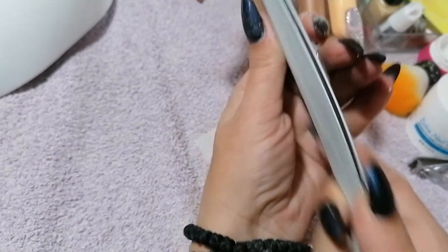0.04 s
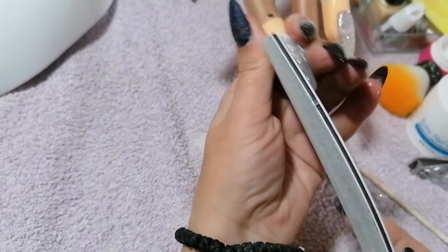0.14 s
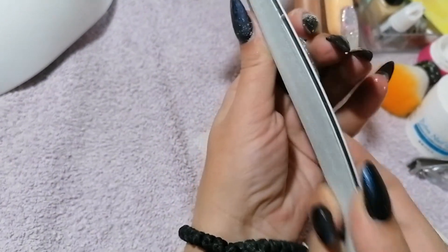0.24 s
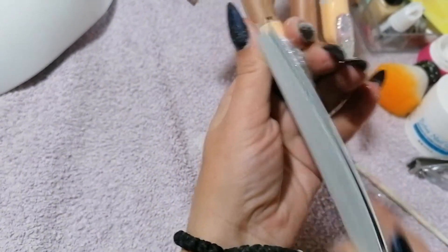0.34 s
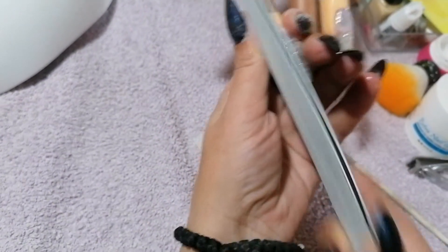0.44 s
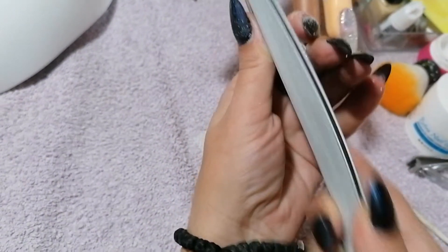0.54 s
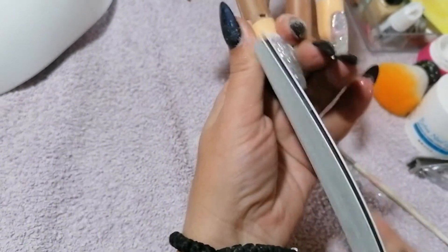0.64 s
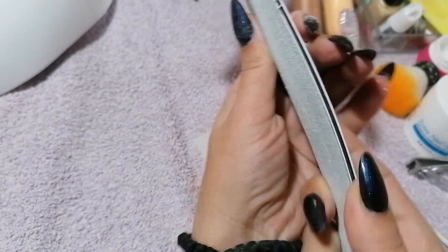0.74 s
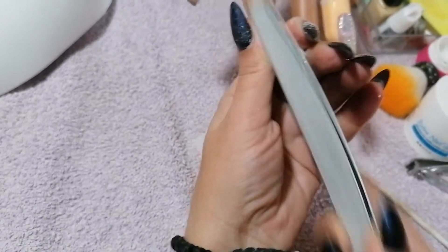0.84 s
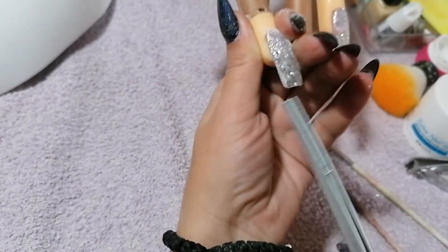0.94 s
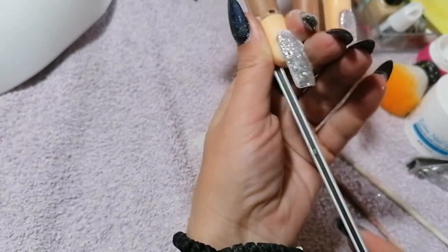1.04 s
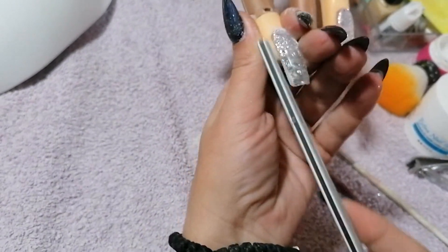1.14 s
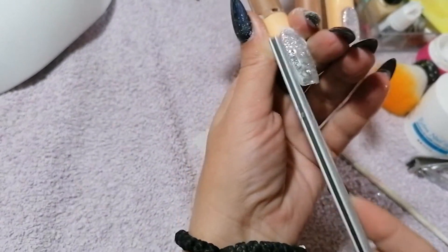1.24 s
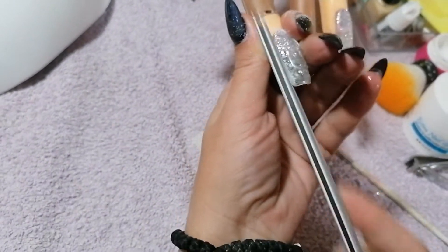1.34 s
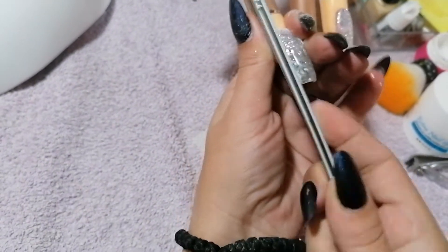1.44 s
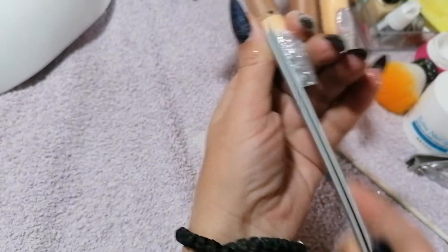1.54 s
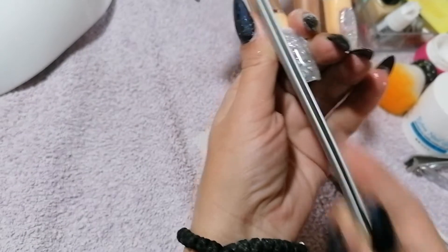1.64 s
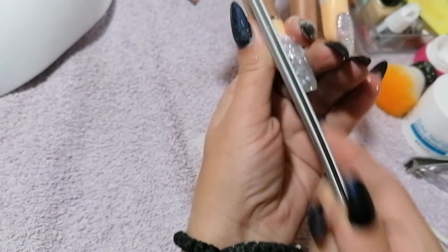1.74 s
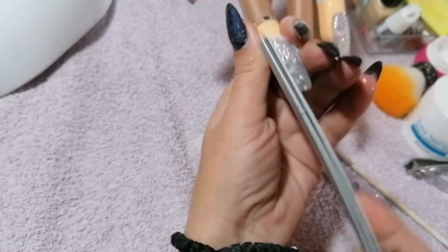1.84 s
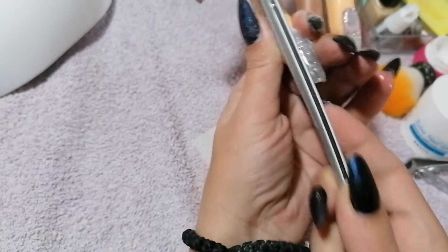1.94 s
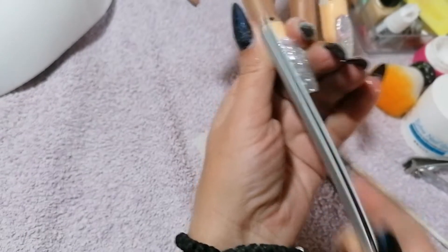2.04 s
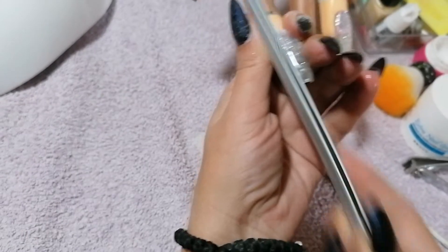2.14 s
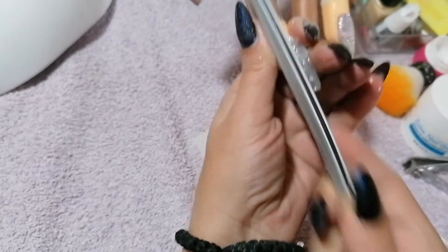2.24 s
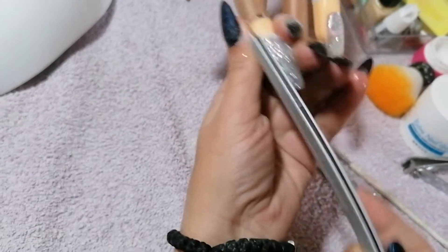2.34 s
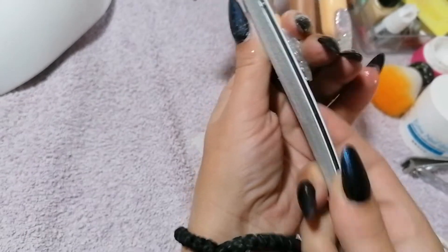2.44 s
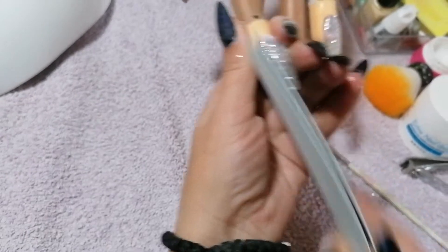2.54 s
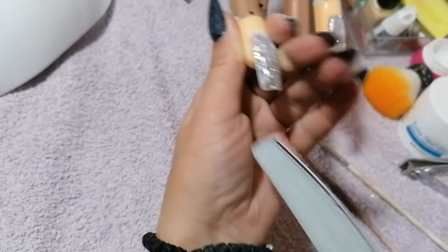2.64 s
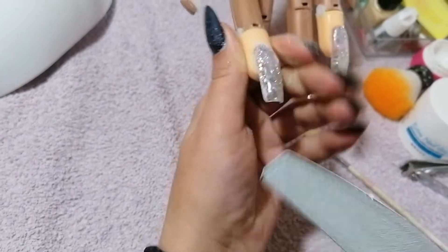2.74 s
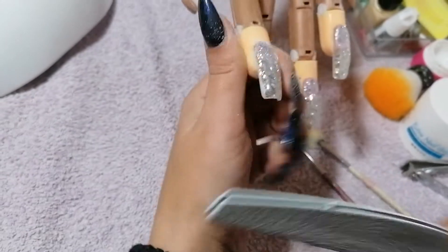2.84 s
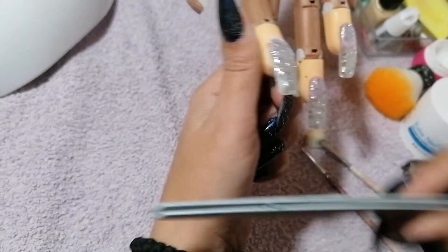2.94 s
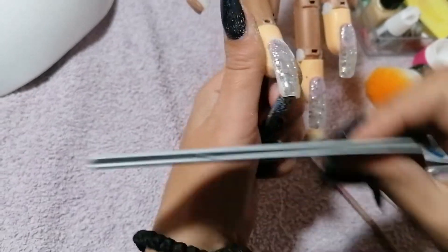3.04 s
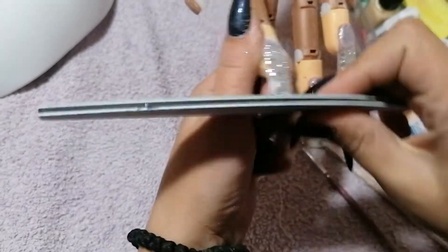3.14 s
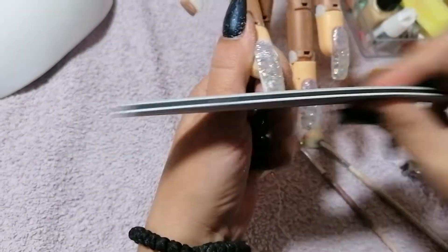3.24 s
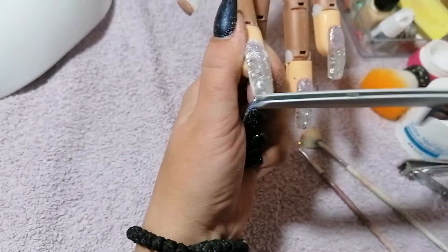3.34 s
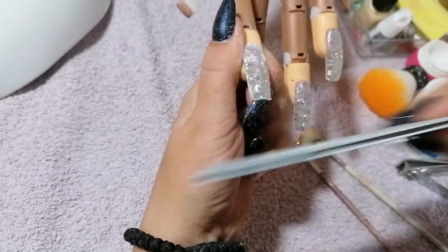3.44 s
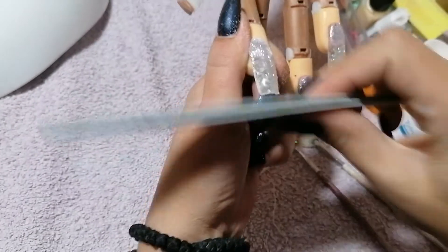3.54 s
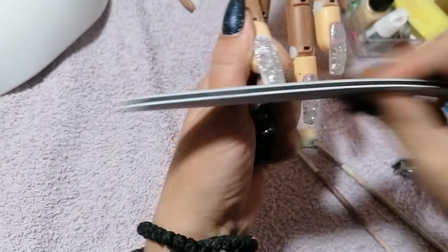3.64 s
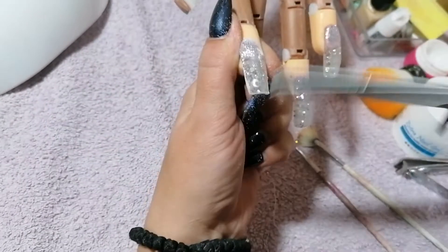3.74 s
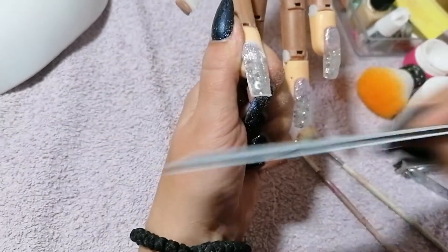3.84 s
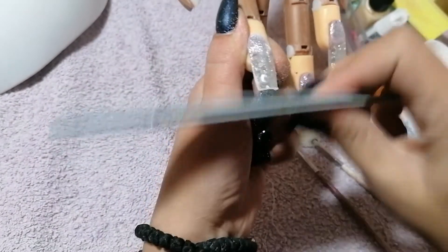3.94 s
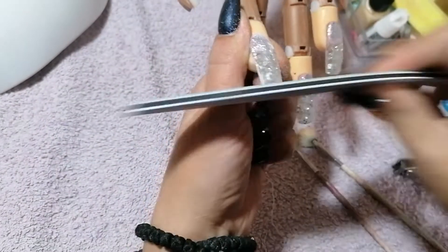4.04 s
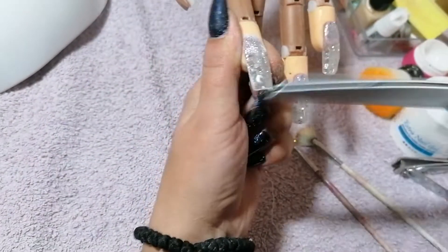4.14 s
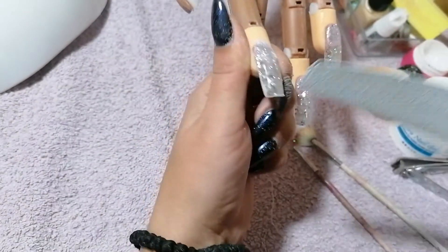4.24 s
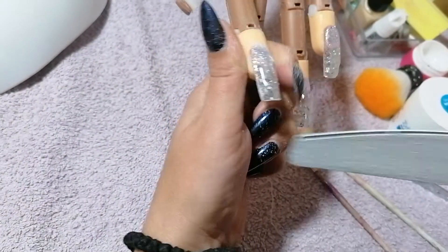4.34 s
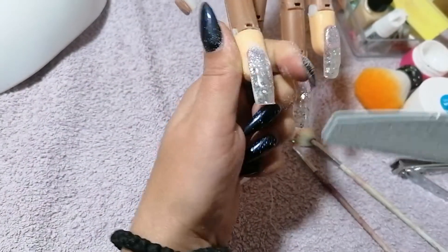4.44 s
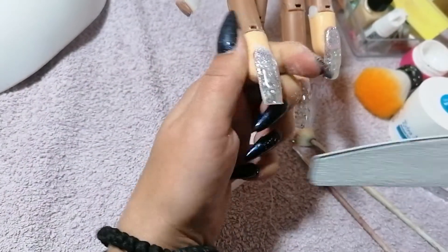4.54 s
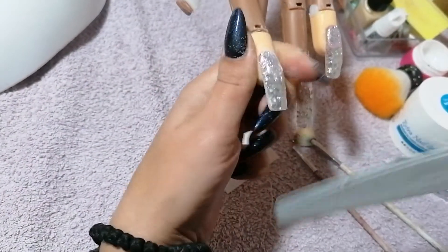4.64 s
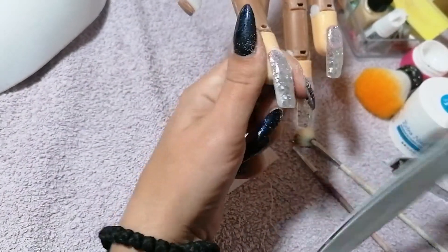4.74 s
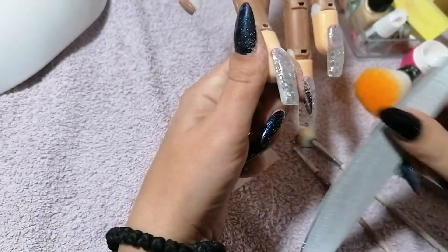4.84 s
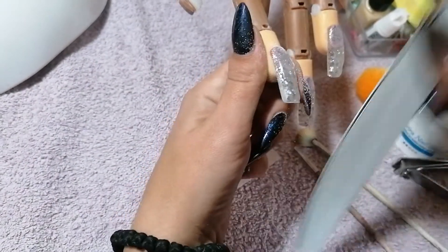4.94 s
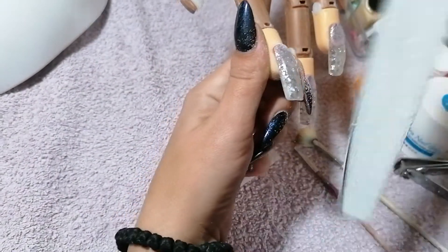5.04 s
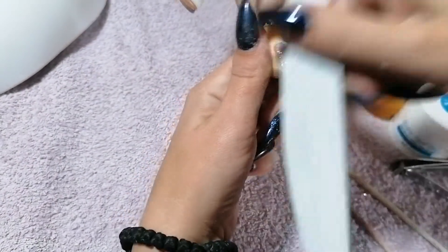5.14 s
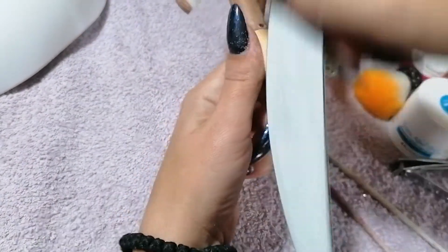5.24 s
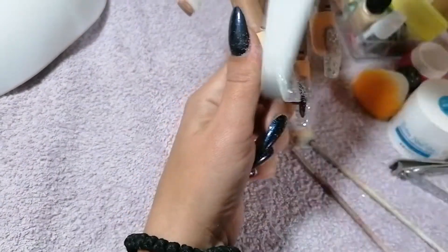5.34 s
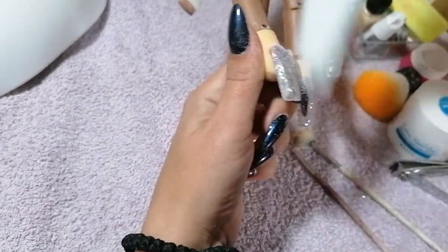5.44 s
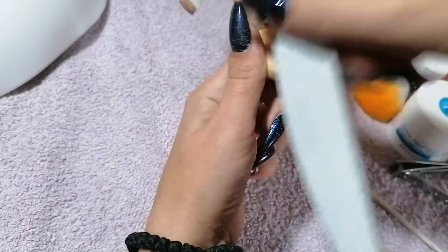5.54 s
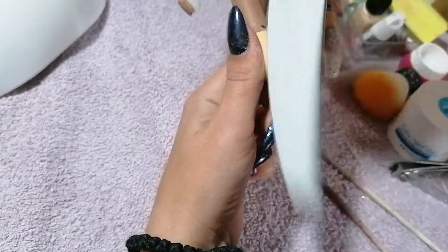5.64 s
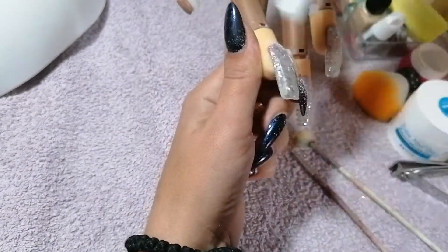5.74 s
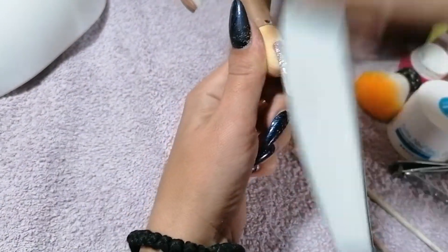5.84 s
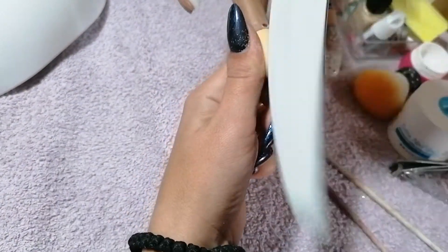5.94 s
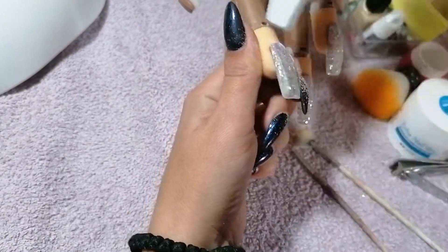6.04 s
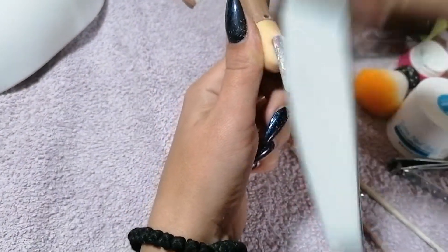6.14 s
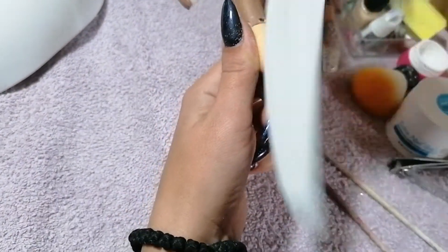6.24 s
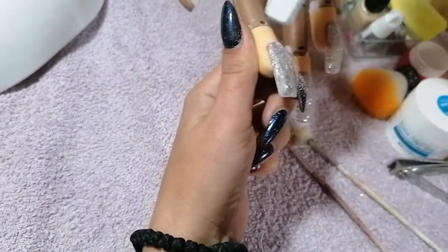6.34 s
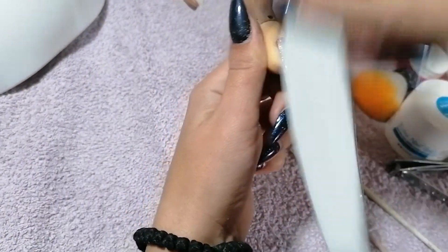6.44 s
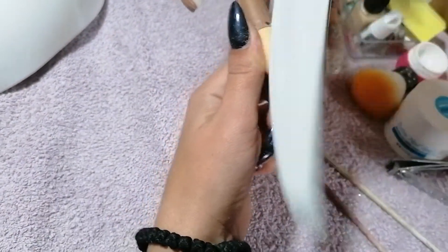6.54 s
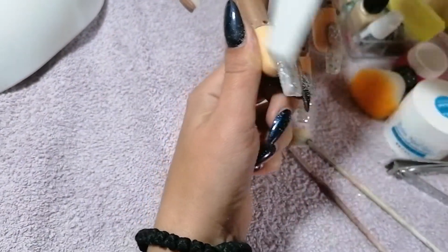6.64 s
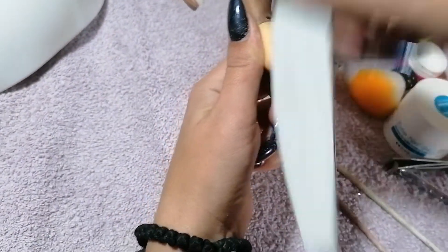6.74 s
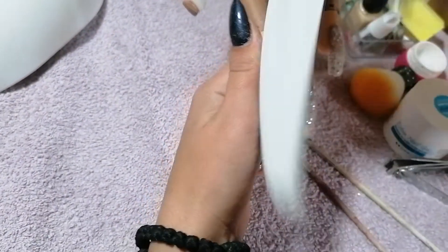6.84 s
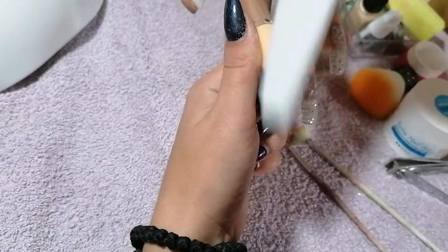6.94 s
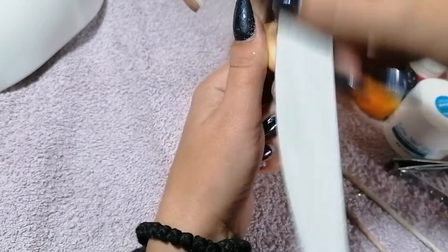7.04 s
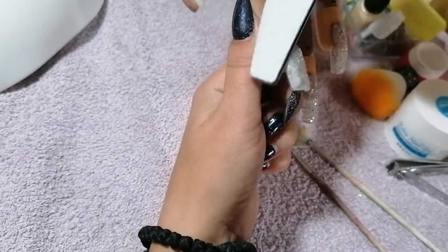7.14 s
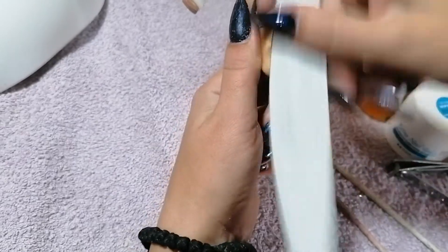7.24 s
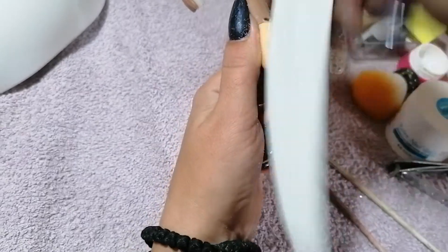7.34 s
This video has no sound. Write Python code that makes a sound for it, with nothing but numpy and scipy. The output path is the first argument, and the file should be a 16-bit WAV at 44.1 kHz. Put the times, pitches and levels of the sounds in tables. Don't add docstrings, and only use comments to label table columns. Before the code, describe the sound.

A nail file scratches a plastic practice nail in brief gritty strokes, pausing often, over low handling thumps, small clicks and steady room hiss.

```python
import sys
import numpy as np
from scipy import signal
from scipy.fft import rfft, irfft, next_fast_len
from scipy.io import wavfile
from scipy.ndimage import uniform_filter1d, map_coordinates

SR = 44100
rng = np.random.default_rng(int(sys.argv[2]) if len(sys.argv) > 2 else 0)


def how_loud(loudness_db):
    steps = np.asarray(loudness_db, float) / 20
    return 10 ** steps


def wav_out(sig):
    wavfile.write(sys.argv[1], SR, np.round(np.clip(np.atleast_2d(sig).T, -1, 1) * 32767).astype(np.int16))


N = 326538


def unit(x):
    return x / np.sqrt(np.mean(x ** 2) + 1e-20)


def even(x, size):
    return unit(x / (uniform_filter1d(abs(x), size) + 0.3))


def along(points, hz):
    f, v = np.transpose(points)
    return np.interp(np.log(hz + 1), np.log(f + 1), v)


def wobble(rate):
    knots = rng.standard_normal(int(N * rate / SR) + 4)
    return map_coordinates(knots, [np.arange(N) * rate / SR])


def filtered(x, response):
    m = next_fast_len(N + 8192)
    return irfft(rfft(x, m) * response(np.fft.rfftfreq(m, 1 / SR)), m)[..., :N]


def resonances(modes):
    def mode(f, centre, width, db):
        loss = 1j * f * width
        return how_loud(db) * loss / (centre * centre - f * f + loss)
    return lambda f: sum((-1) ** k * mode(f, *row) for k, row in enumerate(modes))


def patchy(x, depth_db, bins, frames):
    z = signal.stft(x, nperseg=256)[2]
    field = uniform_filter1d(rng.standard_normal(z.shape[-2:]), bins, 0)
    field = uniform_filter1d(field, frames, 1)
    return signal.istft(z * how_loud(depth_db * unit(field)), nperseg=256)[1][..., :N]


def add(track, s, piece):
    at = track[round(s * SR):][:len(piece)]
    at += piece[:len(at)]


def window(start, end, fade):
    i = np.arange(max(round((start - fade) * SR), 0), min(round((end + fade) * SR), N))
    edge = lambda v: np.sin(np.pi / 2 * np.clip(v / fade + 0.5, 0, 1)) ** 2
    return i, edge(1.19 * (i / SR - start)) * edge(end - i / SR)


# (frequency [Hz], density [dB per Hz])
AIR = [(59, -28), (100, -0.5), (146, -8.5), (306, -10), (355, -14), (603, -15), (919, -18.5), (1370, -18.5),
       (5660, -29.5), (7610, -36), (8450, -44), (14300, -44.5), (15600, -44)]
# (frequency [Hz], correlation [0-1])
ALIKE = [(60, 0.995), (380, 0.999), (2380, 0.997), (15000, 0.96)]
AIR_DB = -68.5


def air():
    turn = lambda hz: np.arccos(np.clip(along(ALIKE, hz), -1, 1)) / 2
    parting = unit(patchy(rng.standard_normal(N), 9, bins=2, frames=12))
    common = patchy(rng.standard_normal(N), 1.28, bins=4, frames=20)
    split = lambda hz: how_loud(along(AIR, hz)) * [np.cos(turn(hz)), np.sin(turn(hz))]
    mid, side = filtered(np.array([common, parting]), split)
    return how_loud(AIR_DB + 0.8 * wobble(3)) * unit(np.array([mid + side, mid - side]))


# (frequency [Hz], density [dB per Hz])
RUMBLE = [(8.8, -31.5), (15, 7), (64, -9), (97, -25), (265, -35), (339, -42.5), (400, -41.5), (520, -85),
          (880, -120)]
# (start [s], hold [s], shake [dB])
PUSHES = [(0.087, 0.045, -50), (0.202, 0.16, -46), (0.456, 0.089, -45), (0.564, 0.12, -49.5),
          (0.864, 0.14, -47), (1.403, 0.016, -47), (1.496, 0.012, -49), (1.611, 0.081, -44.5),
          (1.766, 0.015, -45), (1.867, 0.1, -43), (2.039, 0.3, -46.5), (2.414, 0.14, -49.5),
          (2.644, 0.094, -49.5), (2.834, 0.043, -45), (3.114, 0.017, -52.5), (3.361, 0.023, -45),
          (3.458, 0.051, -47.5), (3.754, 0.12, -50), (4.142, 0.16, -48), (4.635, 0.1, -47.5),
          (4.95, 0.031, -46), (5.358, 0.14, -46.5), (5.721, 0.17, -48), (5.943, 0.12, -50),
          (6.178, 0.041, -53), (6.38, 0.13, -46), (6.629, 0.094, -50), (6.814, 0.042, -51),
          (6.933, 0.19, -50), (7.298, 0.082, -50)]
# (time [s], shake [dB])
NUDGES = [(0.75, -59), (3.2, -57.5), (1.33, -66), (0.59, -46), (6.08, -46.5), (1.08, -51), (1.22, -56),
          (3.0, -66), (3.55, -51), (4.0, -59.5), (4.08, -57), (4.39, -49), (4.86, -56.5), (5.21, -66),
          (5.6, -58), (6.28, -53), (7.17, -59), (7.23, -59)]
NUDGE_S = 0.014
RISE_DB_PER_S, SETTLE_DB_PER_S, REST_DB = 503, 352, -68.5


def shake():
    t, db = np.arange(N) / SR, np.full(N, float(REST_DB))
    for start, hold, push_db in PUSHES + [(s, NUDGE_S, nudge_db) for s, nudge_db in NUDGES]:
        rise = RISE_DB_PER_S * np.maximum(start - t, 0)
        settle = SETTLE_DB_PER_S * np.maximum(t - start - hold, 0)
        db = np.maximum(db, push_db - rise - settle)
    sway = unit(filtered(rng.standard_normal(N), lambda hz: how_loud(along(RUMBLE, hz))))
    sway = sway / (uniform_filter1d(abs(sway), 3000) + 0.25)
    lumps = how_loud(db + 1.5 * wobble(27) + np.minimum(5 * wobble(16), 1) + 4.0) * sway
    return filtered(lumps, lambda hz: 1 / (1 + (hz / 400) ** 4))


# (time [s], peak [dB], pitch [Hz], length [s], rattle [dB])
KNOCKS = [(0.031, -55, 1370, 0.0017, -26), (0.293, -68, 386, 0.0088, -20), (.713, -59, 1000, .002, -23),
          (1.557, -50, 274, 0.018, -14), (1.5673, -38, 700, 0.0035, -17), (1.5676, -45, 1470, 0.0032, -34),
          (1.736, -45, 890, 0.0022, -25), (3.399, -34, 1050, 0.0023, -17.5), (3.44, -61, 775, 0.0048, -18),
          (6.118, -48, 287, 0.0035, -19), (6.13, -65, 405, 0.0045, 4.5)]


def knocks():
    out, t = np.zeros(N), np.arange(SR // 10) / SR
    wood = signal.butter(2, [200, 1000], "bandpass", fs=SR)
    for s, db, hz, length, rattle_db in KNOCKS:
        partials = [(1, 1), (2.1, 0.3), (3.1, 0.22)]
        tone = sum(strength * np.sin(2 * np.pi * ratio * hz * t) for ratio, strength in partials)
        blow = np.sqrt(np.sin(np.pi * np.clip(t / length, 0, 1)) + 1e-12) * tone
        rattle = unit(signal.lfilter(*wood, rng.standard_normal(len(t))))
        rattle = rattle * how_loud(rattle_db - 60 * t / 0.18) * (1 - np.exp(-t / 0.0014))
        add(out, s, how_loud(db) * (blow + rattle))
    return out


def tabletop(x):
    t = np.arange(SR // 4) / SR
    tail = rng.standard_normal(len(t)) * (how_loud(-60 * t / 0.065) + how_loud(-23.0 - 60 * t / 0.43))
    return signal.fftconvolve(x, tail / np.linalg.norm(tail))[:N]


# (start [s], end [s], hiss [dB], change over the stroke [dB], board over hiss [dB])
SIDE_STROKES = [
    (0.561, 0.598, -42.5, 16, -4),
    (0.595, 0.62, -46, 16, -8),
    (0.634, 0.66, -44, -3, -6),
    (0.697, 0.789, -42, -0.5, -9.5),
    (0.807, 0.851, -41.5, 2.5, -5),
    (0.939, 0.985, -45, -1, -8.5),
    (1.479, 1.493, -51, -2, -10),
    (1.599, 1.621, -47.5, -1.5, -3),
    (2.376, 2.393, -47, 21, -15),
    (2.395, 2.43, -45, 11, -8),
]
TIP_STROKES = [(3.028, 3.035, -51.5, -3, -19), (3.367, 3.388, -49.5, -18, -8),
               (3.405, 3.479, -38.5, -0.5, -4.5), (3.787, 3.813, -37.5, -8.5, -8),
               (5.345, 5.362, -52.5, -4, -6.5), (5.726, 5.741, -50.5, 6, -0.2),
               (5.775, 5.832, -42.5, -2.5, -3), (6.065, 6.086, -49, -9.5, -7),
               (6.146, 6.172, -48.5, -4, -2.5), (6.316, 6.327, -56, -24, -2),
               (6.454, 6.471, -51.5, -1, -6.5), (6.882, 6.886, -53, -23, -11),
               (7.33, 7.346, -58.5, -11, -5.5)]
FLAT_STROKES = [
    (0.237, 0.265, -42.5, -8, -14),
    (1.516, 1.534, -46, -13, -10),
    (1.729, 1.771, -42.5, -2, -4.5),
    (2.145, 2.162, -45.5, -3, -12),
    (2.267, 2.31, -40, 1, -11),
    (2.534, 2.552, -43.5, 2, -5),
]
# (start [s], end [s], hiss [dB], change [dB])
GRAZES = [(-0.006, 0.007, -49.5, -2), (1.31, 1.335, -70.5, -10), (1.345, 1.4, -71, 4),
          (1.397, 1.445, -69.5, -18), (2.598, 2.623, -61, 12), (2.768, 2.819, -60, 6),
          (3.057, 3.122, -69.5, 3), (3.285, 3.329, -72.5, 2), (3.538, 3.597, -70, -6),
          (3.715, 3.729, -68, 4), (5.286, 5.35, -69.5, -6), (5.528, 5.616, -70.5, -12),
          (6.51, 6.59, -70.5, -10)]
RUSTLES = [(0.024, 0.053, -69, 10), (0.548, 0.554, -66, -2), (0.782, 0.808, -62, -5),
           (1.11, 1.135, -71.5, -14), (1.151, 1.166, -77.5, -19), (1.188, 1.31, -80.5, 0),
           (1.576, 1.594, -61.5, 9), (2.917, 2.934, -67, -9), (2.973, 3.025, -69, -5),
           (3.188, 3.316, -79.5, -12), (3.603, 3.731, -74, 6), (4.009, 4.022, -78, -1),
           (4.074, 4.095, -78, 2), (4.437, 4.493, -78, 0), (4.522, 4.537, -78, 17),
           (4.607, 4.643, -72.5, -1), (4.97, 5.167, -79.5, -2), (5.616, 5.697, -79, -10),
           (5.915, 5.936, -76, 4), (6.245, 6.275, -79.5, -5), (1.445, 1.475, -80, 0), (3.33, 3.36, -80, 0),
           (4.495, 4.52, -81, 2), (6.834, 6.872, -79, 6), (5.836, 5.85, -74, -6), (3.817, 3.828, -70, -6),
           (1.776, 1.785, -66.5, -1)]
WHISKS = [
    (4.103, 4.119, -65, -1),
    (4.329, 4.367, -64.5, 7),
    (4.364, 4.401, -61.5, -5),
    (4.408, 4.434, -65.5, 0),
    (5.18, 5.213, -61, 0),
    (5.212, 5.274, -55, -13.5),
]
DRAGS = [
    (0.88, 0.935, -84, 3),
    (0.668, 0.692, -80, 0),
    (2.17, 2.225, -84, -3),
    (2.318, 2.36, -81, -7),
    (2.44, 2.475, -83, -3),
    (3.388, 3.402, -72.5, 0),
    (6.088, 6.115, -79, -3),
    (6.175, 6.195, -80, -4),
    (3.487, 3.515, -82, -4),
    (3.83, 3.86, -82, -4),
]
# (upper band over hiss [dB], lower band over hiss [dB])
GRAZE_BODY_DB = (-2, -4)
RUSTLE_BODY_DB = (3.5, 6)
WHISK_BODY_DB = (-17, -13)
SIDE_NAIL_DB, TIP_NAIL_DB, FLAT_NAIL_DB = -1.5, -11, -3.5


def contacts():
    strokes = [(SIDE_STROKES, SIDE_NAIL_DB), (TIP_STROKES, TIP_NAIL_DB), (FLAT_STROKES, FLAT_NAIL_DB)]
    firm = [(*row[:4], nail_db, row[4]) for rows, nail_db in strokes for row in rows]
    kinds = [(GRAZES, GRAZE_BODY_DB), (RUSTLES, RUSTLE_BODY_DB), (WHISKS, WHISK_BODY_DB),
             (DRAGS, RUSTLE_BODY_DB)]
    return firm + [(*row, *body_db) for rows, body_db in kinds for row in rows]


def handover():
    near = np.zeros(N)
    for start, end, *_ in contacts()[:-len(DRAGS)]:
        i, shape = window(start - 0.003, end + 0.00055, fade=0.0093)
        near[i] += shape
    return np.clip(near, 0, 1)


# (frequency [Hz], density [dB per Hz])
WHISK_AIR = [(8000, -38), (11000, 3), (12500, -3), (14500, -7), (15300, -21)]
# (start [s], end [s], level [dB])
DUST = [(3.303, 3.32, -70), (3.715, 3.732, -73), (4.098, 4.124, -66.5), (4.342, 4.4, -73),
        (4.41, 4.432, -73), (5.18, 5.21, -72), (5.21, 5.245, -63), (5.245, 5.27, -72), (6.147, 6.17, -53),
        (6.453, 6.473, -58), (6.877, 6.886, -66), (7.33, 7.345, -70), (5.53, 5.56, -80)]


def sheen():
    level = np.zeros(N)
    for start, end, db in DUST:
        i, shape = window(start, end, fade=0.012)
        level[i] += shape * how_loud(db)
    return level * unit(filtered(rng.standard_normal(N), lambda hz: how_loud(along(WHISK_AIR, hz))))


# (time [s], peak [dB], pitch [Hz])
TICKS = [(0.807, -46, 8530), (0.965, -36, 7440), (1.3104, -63, 9000), (1.3493, -61, 8040),
         (1.404, -59, 9290), (1.479, -44.5, 9250), (1.598, -44.5, 9100), (2.6163, -47.5, 9800),
         (3.1163, -43, 4100), (3.3199, -56, 4080), (5.2932, -53, 3830), (5.627, -57, 3300),
         (2.8158, -47.5, 2300), (3.0335, -53, 4400), (6.1625, -41, 11900), (6.4653, -46.5, 5570),
         (6.8782, -48.5, 4000), (0.847, -41, 9900), (1.1225, -67, 9300), (6.1505, -51, 7200),
         (6.155, -42, 9700), (5.2952, -50, 6330), (4.417, -56, 9700)]
SNAGS = [(0.5756, -34, 2100), (0.5914, -34, 2840), (0.7154, -34, 3060), (0.7434, -35, 2130),
         (0.8254, -34, 2100), (1.6072, -38, 2790), (1.732, -40, 2810), (1.7414, -35, 2980),
         (2.2864, -32, 9770), (3.4176, -32, 9380), (3.4344, -33, 2390), (3.4544, -34, 4100),
         (3.7928, -32, 6320), (5.8194, -37, 3000)]
SNAG_DB = -5
# (time [s], peak [dB])
TAPS = [
    (6.3135, -45),
    (6.3153, -40),
    (6.318, -40.5),
]
# (frequency [Hz], level [dB], t60 [s])
PLASTIC = [(1050, -1, 0.019), (1630, 0, 0.022), (2090, 7, 0.012), (3560, 1.5, 0.011), (3880, 3, 0.015),
           (4170, -1, 0.013), (6600, -7, 0.013), (8840, -9, 0.02)]


def ticks():
    out, t = np.zeros(N), np.arange(SR // 20) / SR
    for s, db, hz in TICKS + [(s, db + SNAG_DB, hz) for s, db, hz in SNAGS]:
        around = signal.butter(1, [0.59 * hz, min(1.2 * hz, 16000)], "bandpass", fs=SR)
        crack = 1.33 * unit(signal.lfilter(*around, rng.standard_normal(len(t)))) * how_loud(-60 * t / 0.0064)
        ping = np.sin(2 * np.pi * hz * t) * how_loud(-60 * t / 0.007)
        add(out, s, how_loud(db + 4.0) * (0.61 * np.sqrt(hz / 9000) * crack + ping))
    for s, db in TAPS:
        ring = sum(how_loud(level + rng.normal(0, 2.5) - 60 * t / t60) * np.sin(2 * np.pi * hz * t)
                   for hz, level, t60 in PLASTIC)
        add(out, s, how_loud(db) * 0.54 * ring)
    return out


# (start [s], end
# [s], pitch [Hz], width [Hz], level [dB])
LOCKS = [(0.628, 0.658, 606, 80, -52.5), (1.143, 1.163, 2000, 300, -68), (3.022, 3.04, 6040, 900, -59.5),
         (3.117, 3.12, 2215, 500, -50), (3.231, 3.279, 303, 30, -64), (3.321, 3.325, 2300, 500, -50),
         (3.369, 3.384, 1050, 150, -56), (3.371, 3.384, 4040, 400, -55), (3.4, 3.45, 299, 59.7, -51),
         (3.54, 3.598, 1250, 800, -64.5), (3.612, 3.725, 2200, 800, -68), (3.785, 3.814, 1364, 160, -46),
         (4.098, 4.119, 9260, 900, -63.5), (4.368, 4.398, 4380, 400, -70), (5.186, 5.268, 3330, 900, -70),
         (5.202, 5.232, 5780, 600, -54.5), (5.778, 5.814, 9340, 900, -45.5),
         (6.064, 6.084, 4260, 1000, -51), (6.148, 6.162, 2990, 250, -56), (6.454, 6.467, 3020, 250, -59),
         (0.086, 0.101, 2700, 1200, -66), (1.106, 1.128, 1956, 400, -66), (1.359, 1.444, 2710, 900, -74),
         (3.367, 3.38, 7600, 1500, -52), (3.407, 3.477, 2804, 900, -51), (4.1, 4.122, 1490, 1200, -73),
         (4.337, 4.4, 2870, 700, -72.5), (5.175, 5.216, 4300, 600, -62), (5.21, 5.245, 11200, 900, -60),
         (5.728, 5.743, 3000, 1000, -61), (5.798, 5.828, 4290, 700, -51), (6.068, 6.079, 8300, 2500, -48.5),
         (6.877, 6.885, 1986, 600, -58.5), (5.626, 5.66, 1480, 500, -69), (4.97, 5.02, 9500, 900, -82),
         (3.41, 3.424, 586, 120, -51), (0.816, 0.836, 949, 150, -49.5), (0.718, 0.735, 1334, 120, -49),
         (3.199, 3.26, 3110, 500, -75), (3.792, 3.804, 6230, 900, -44.5),
         (2.146, 2.163, 2800, 200, -50), (1.603, 1.613, 2300, 250, -51), (0.955, 0.972, 2300, 240, -47.5),
         (2.536, 2.553, 2820, 250, -52), (2.272, 2.308, 6900, 600, -49), (6.066, 6.084, 900, 300, -54),
         (6.146, 6.158, 790, 300, -56), (3.789, 3.812, 899, 99, -48.5), (3.366, 3.386, 1360, 110, -52),
         (4.975, 5.02, 7300, 700, -86), (5.065, 5.14, 7400, 900, -82), (5.07, 5.13, 9500, 900, -81),
         (0.72, 0.78, 5400, 600, -55), (0.575, 0.62, 5300, 600, -53), (2.38, 2.393, 2300, 300, -51),
         (2.536, 2.553, 7310, 500, -50), (3.415, 3.475, 4000, 400, -48.5), (1.577, 1.6, 1380, 150, -60),
         (5.78, 5.83, 619, 100, -56.5), (5.78, 5.83, 3040, 230, -52.5), (6.148, 6.158, 7900, 900, -57),
         (0.81, 0.85, 2150, 280, -52.5), (1.48, 1.493, 2500, 400, -60), (1.52, 1.535, 1370, 150, -59),
         (1.735, 1.77, 1380, 130, -53.5), (3.79, 3.81, 4000, 500, -49.5), (5.918, 5.936, 2200, 500, -69),
         (0.705, 0.785, 1700, 540, -56), (3.64, 3.72, 250, 150, -68), (0.79, 0.82, 170, 60, -63),
         (1.575, 1.62, 210, 100, -60), (3.83, 3.9, 260, 150, -67), (6.25, 6.265, 2100, 600, -70),
         (5.345, 5.36, 9600, 600, -64), (2.275, 2.305, 1330, 120, -53), (3.8, 3.82, 300, 80, -63),
         (5.16, 5.172, 11000, 900, -76), (2.38, 2.43, 7190, 500, -55), (0.24, 0.262, 2400, 500, -51)]
# (start [s], end [s], first pitch [Hz], last pitch [Hz], level [dB])
SLIDES = [
    (3.408, 3.447, 1416, 887, -49),
    (3.444, 3.481, 899, 1395, -47),
]
SLIDE_WIDTH_HZ = 160


def locks():
    out = np.zeros(N)
    steady = [(s, e, hz, hz, width, db) for s, e, hz, width, db in LOCKS]
    gliding = [(*row[:4], SLIDE_WIDTH_HZ, row[4]) for row in SLIDES]
    for start, end, first_hz, last_hz, width_hz, db in steady + gliding:
        i, shape = window(start, end, fade=0.012)
        phase = 2 * np.pi * np.cumsum(np.linspace(first_hz, last_hz, len(i))) / SR
        lowpass = signal.butter(2, width_hz / 2, fs=SR)
        slow = signal.lfilter(*lowpass, rng.standard_normal((2, SR // 4)))[:, -len(i):]
        out[i] += how_loud(db) * shape * unit(slow[0] * np.cos(phase) + slow[1] * np.sin(phase))
    return out


def grit(spread_db):
    grain_db = spread_db * np.minimum(rng.exponential(size=N), 5)
    sizes = how_loud(grain_db + 1.4 * wobble(300) + 1.1 * wobble(90))
    return patchy(sizes * rng.standard_normal(N), 1.6, bins=3, frames=8)


# (frequency [Hz], density [dB per Hz])
HISS = [(1940, -42), (3300, -4), (4030, -4), (4850, -1.5), (5400, 3.5), (6390, -3), (6950, 3.5), (8640, 2),
        (9890, 4), (10800, 0.5), (11500, -8), (14200, -4.5), (15300, -9.5)]
HISS_TIP = [(1940, -17), (3300, -1.5), (3590, -8.5), (3980, 2), (4880, -8), (5840, 0.5), (6950, -4.5),
            (7700, -2), (8370, -3.5), (9450, 3), (10700, -10), (12700, -8.5), (14500, -10), (15300, -6.5)]
BRUSH = [(1940, -33), (3300, -8), (3730, 2), (4400, -3.5), (6230, -5.5), (7270, -2), (8420, -4.5),
         (9700, 0.5), (11000, -12.5), (14300, -25), (15300, -16)]
# (frequency [Hz], width [Hz], level
# [dB])
NAIL = [(2116, 225, 6.5), (2390, 335, 6.5), (2940, 580, 5.5), (3174, 150, 2.5)]
BOARD = [(282, 53, -3), (588, 80, -5.5), (887, 81, 1), (1050, 33, -1), (1345, 55, 5), (1628, 72, -1.5)]
BOARD_TIP = [(446, 800, -6), (900, 81, 2), (1078, 44, 3.5), (1345, 174, 2), (1700, 410, -4.5)]
# (frequency [Hz], width [Hz], level [dB])
SKIN = [(2300, 660, 7.5), (3270, 490, 6)]
CLOTH = [(500, 970, -4), (1140, 430, 2.5), (1646, 640, -5)]
REGRIP = 3


def filing():
    power = np.zeros((6, N))
    for start, end, db, change_db, nail_db, board_db in contacts():
        firm = np.clip((db + abs(change_db) / 2 + 57) / 12, 0, 1)
        i, shape = window(start, end, fade=0.018 + 0.32 * (1 - firm) * (end - start))
        way = np.clip((i / SR - start) / (end - start), 0, 1)
        press_db = 4.8 * firm * min(1, 0.041 / (end - start)) * (np.sin(np.pi * way) - 0.93)
        level = shape * how_loud(db + change_db * (way - 0.5) + press_db)
        shares = np.outer([firm, 1 - firm], how_loud([0, 2 * nail_db, 2 * board_db]))
        power[:, i] += np.outer(shares, level ** 2)
    grains, side = grit(spread_db=1.7), np.arange(N) < REGRIP * SR

    def through(response):
        return even(unit(filtered(np.roll(grains, rng.integers(N)), response)), size=1300)

    colour = lambda points: through(lambda hz: how_loud(along(points, hz)))
    hiss = np.where(side, colour(HISS), colour(HISS_TIP))
    board = np.where(side, through(resonances(BOARD)), through(resonances(BOARD_TIP)))
    firm_layers = [hiss, through(resonances(NAIL)), board]
    light_layers = [colour(BRUSH), through(resonances(SKIN)), through(resonances(CLOTH))]
    power[3:] *= how_loud([2.6 * wobble(30), 1.9 * wobble(23), 1.1 * wobble(20)])
    return (np.sqrt(power) * (firm_layers + light_layers)).sum(0)


NEAR_SHAKE = 0.18
BODY_LOW_HZ = 218
SWAY_SIDE_DB = -18.5


def scene():
    room = air()
    far = room + shake() + knocks()
    far[1] += how_loud(SWAY_SIDE_DB) * shake()
    rasp = filtered(filing(), lambda hz: 1 / (1 + (BODY_LOW_HZ / (hz + 1)) ** 4))
    close = rasp + locks() + ticks() + sheen()
    near = handover()
    near_hiss = how_loud(-3.5) * np.roll(room[0], SR)
    far[1] = (1 - (1 - NEAR_SHAKE) * near) * far[1] + np.sqrt(near * (2 - near)) * near_hiss
    far[1] += close + how_loud(-24.5) * tabletop(close)
    return far


def top_cut(x):
    return signal.sosfilt(signal.butter(12, 16110, fs=SR, output="sos"), x)


def record(dry):
    top_hz = 15120
    limited = filtered(dry, lambda hz: 1 / (1 + (hz / top_hz) ** 120))
    return top_cut(limited)


dry = scene()
out = record(dry)
wav_out(out)
```